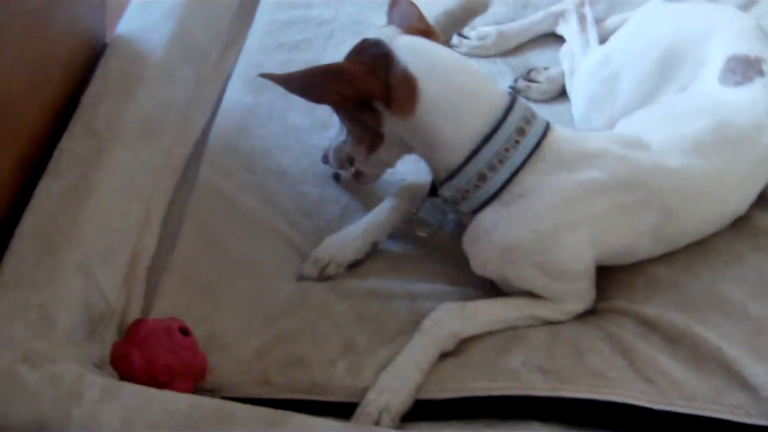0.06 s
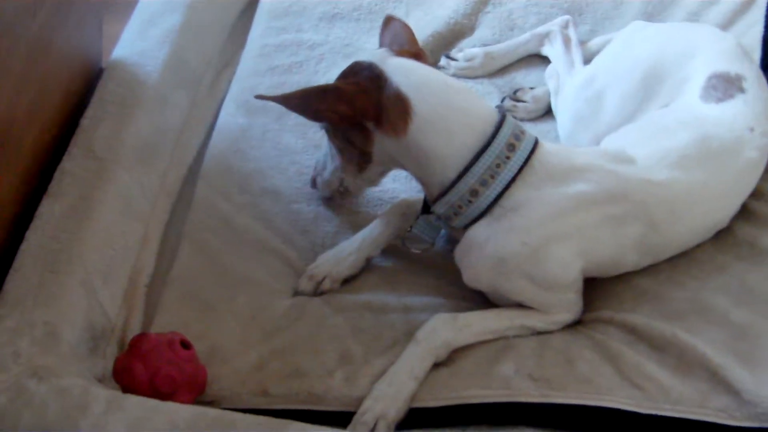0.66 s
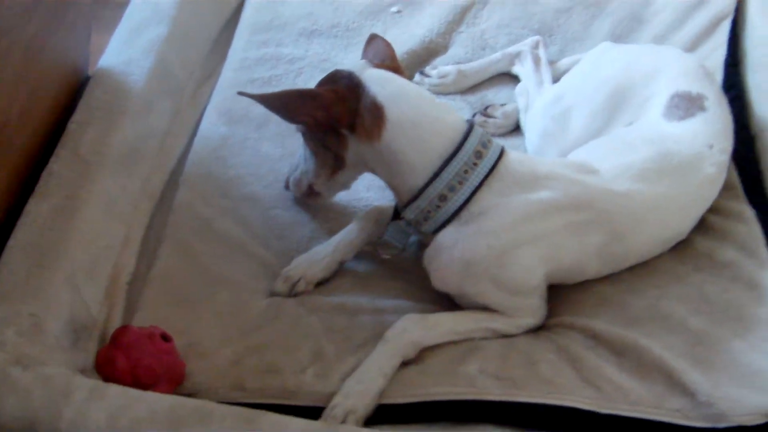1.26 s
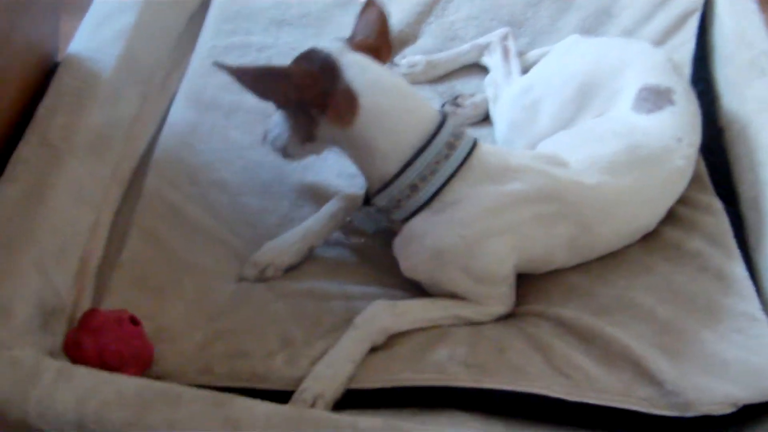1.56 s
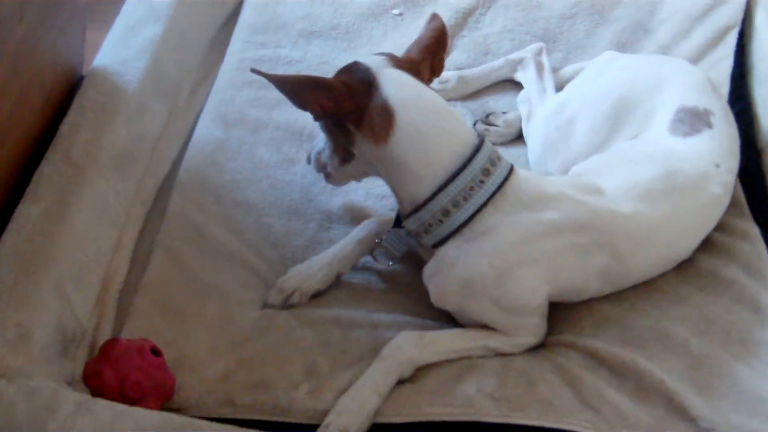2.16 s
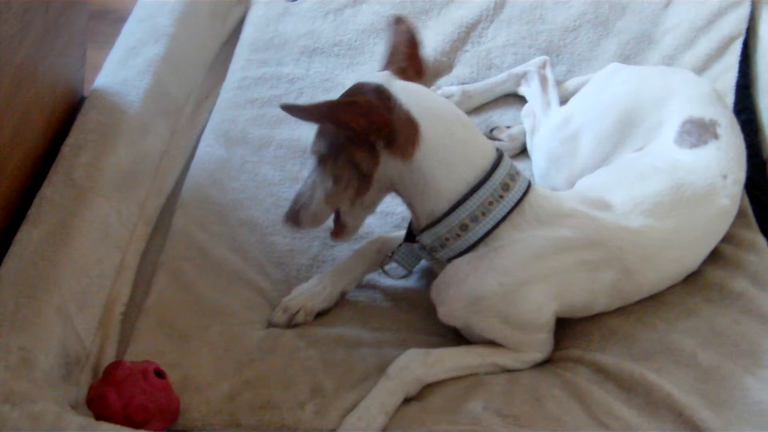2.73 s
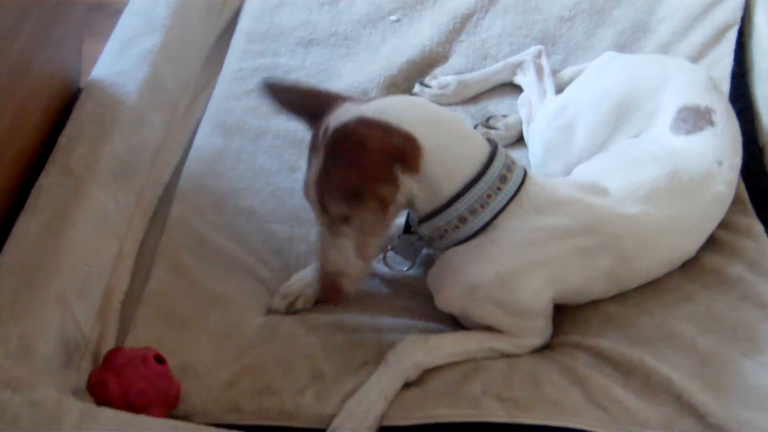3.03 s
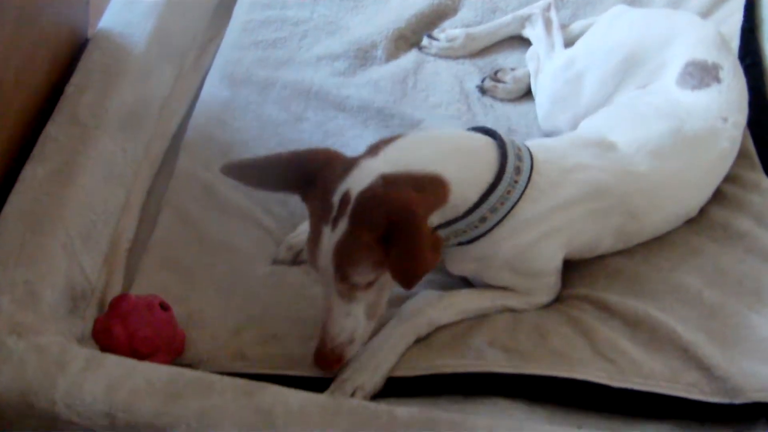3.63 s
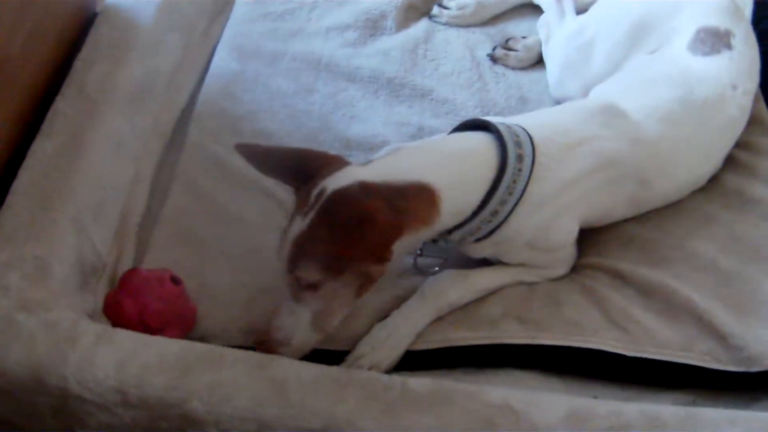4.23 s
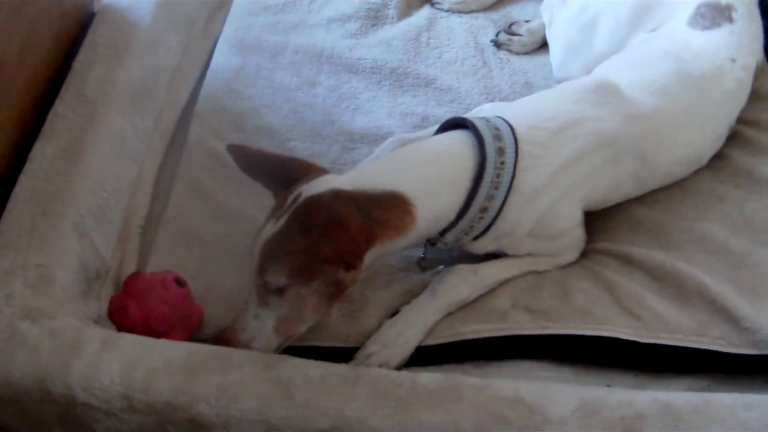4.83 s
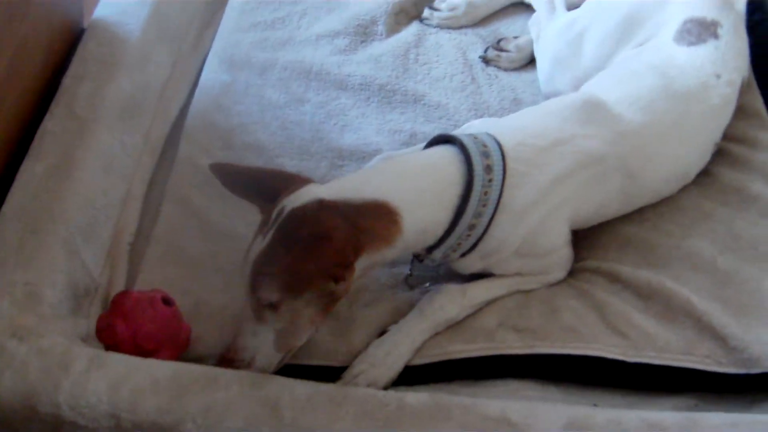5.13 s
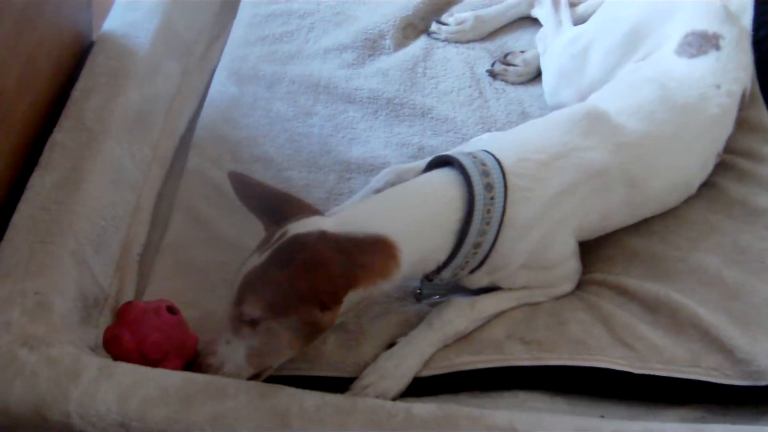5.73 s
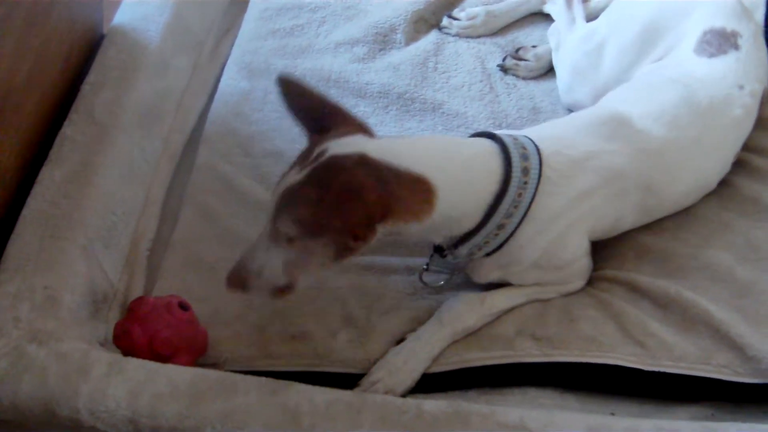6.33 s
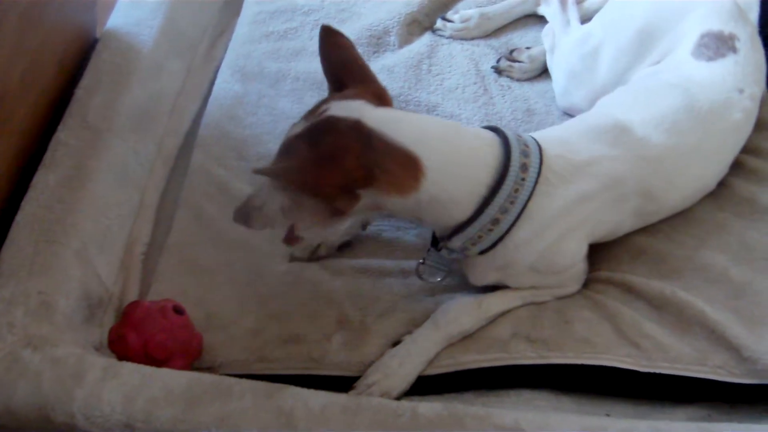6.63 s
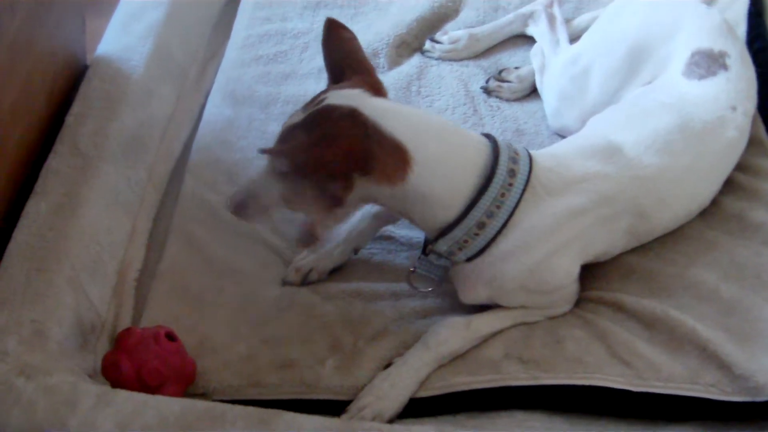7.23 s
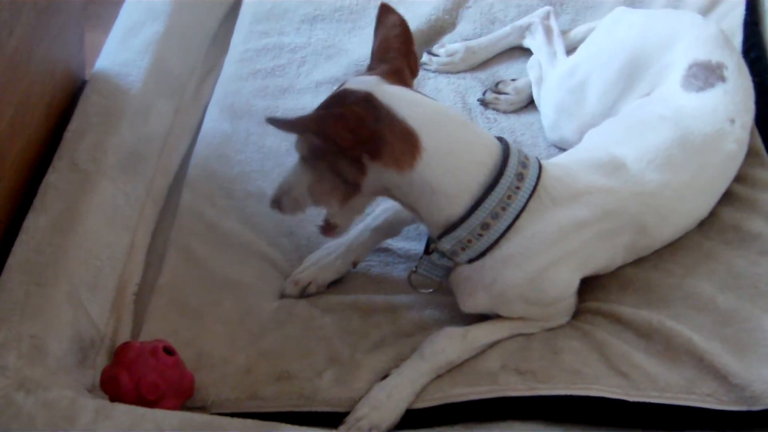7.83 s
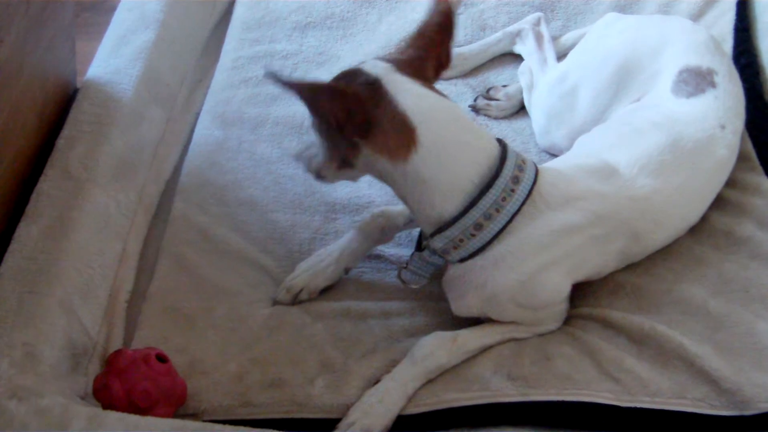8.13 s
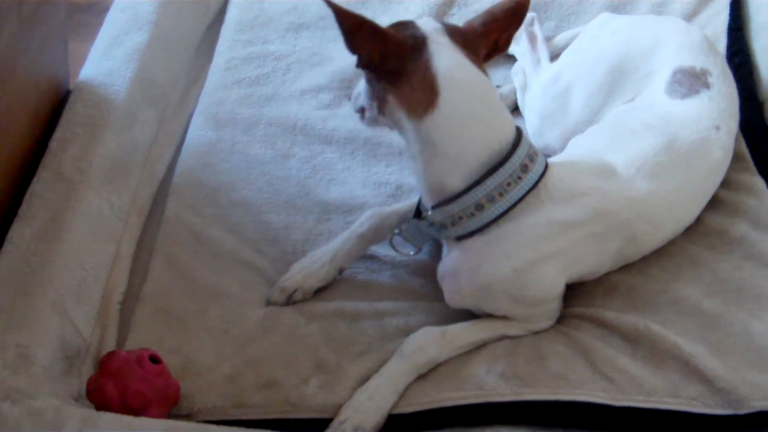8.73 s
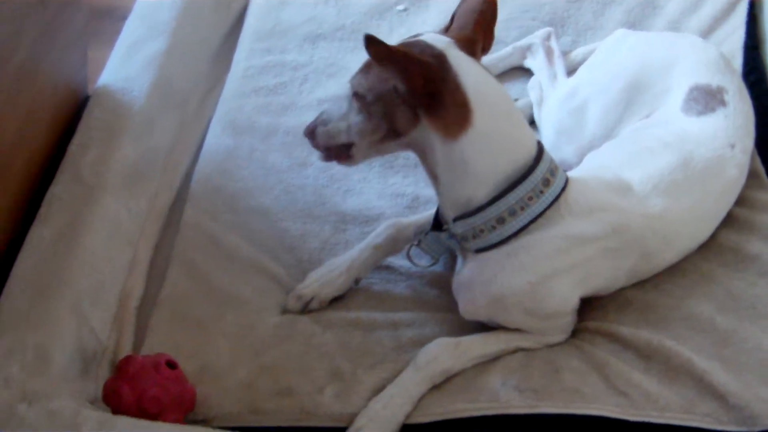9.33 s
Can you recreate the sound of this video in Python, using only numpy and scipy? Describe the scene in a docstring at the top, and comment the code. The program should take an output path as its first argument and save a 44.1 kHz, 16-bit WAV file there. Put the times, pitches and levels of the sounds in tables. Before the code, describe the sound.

A small dog crunches hard treats in a quiet room. A few crisp bites and a lip smack come first, then a second short bout. After a pause of several seconds with only faint hiss, it chews again in a longer, louder run of cracks, crumb crackle, tooth clicks and wet smacks. The sounds are small and centred, with a light room echo.

```python
"""A small dog crunches hard treats in three bouts, lying on its bed in a quiet, fairly live room.
Each bite is a cluster of tiny fractures that rings the treat, the teeth and the hollow of the mouth.
Crumbs crackle, teeth click, lips smack and the jaw thumps shut. Under the room's tail lie a steady
hiss, a faint low hum and the thin whine and buzz of a camera's electronics."""
import sys
import numpy as np
from scipy import signal
from scipy.fft import rfft, irfft
from scipy.io import wavfile

SR = 44100
rng = np.random.default_rng(int(sys.argv[2]) if len(sys.argv) > 2 else 0)


def wrap_up_sound(samples):
    """Save the sound to the file named by the first command line argument, as 16-bit audio."""
    columns = np.atleast_2d(samples).T
    # keep every value between -1 and 1, then stretch to whole-number steps
    tamed = np.clip(columns, -1, 1)
    steps = np.round(tamed * 32767).astype(np.int16)
    wavfile.write(sys.argv[1], SR, steps)


N = 422037
TIME = np.arange(N) / SR
BIN_HZ = np.arange(N // 2 + 1) * SR / N
HIT_TIME = np.arange(4096) / SR   # time axis of one short hit

# The jaw closes and breaks a treat. Each row: start in seconds, snap, splinter and mouth levels in dB,
# mouth resonance in Hz, thud level in dB, fracture time in seconds.
CHOMP_HITS = [(0.1104, -44, -47, -44, 1540, -51, 0.0024), (0.191, -43, -53, -44.5, 1510, -43.5, 0.00047),
              (0.5144, -50, -65, -54.5, 1510, -57.5, 0.00073), (1.9225, -36.5, -37, -37, 650, -44, 0.00053),
              (2.242, -41, -49, -46.5, 575, -48, 0.0013), (2.2781, -38.5, -48.5, -63, 585, -49.5, 0.00105),
              (6.8146, -35, -37, -28, 1447, -38, 0.00048), (7.1684, -38.5, -39.5, -37, 1460, -45, .0012),
              (7.422, -40, -44.5, -35.5, 1634, -48.5, 0.00048)]
# Small pieces chip off around the chomps. Each row: start in seconds, snap level in dB.
CHIP_HITS = [(0.3673, -46.5), (1.858, -57.5), (1.9545, -50), (2.657, -54), (6.868, -44), (6.9057, -42),
             (6.924, -43.5), (7.08, -49.5), (7.0995, -46), (7.117, -43.5), (7.126, -48), (7.2066, -42.5),
             (7.397, -42), (7.4486, -41), (7.717, -50), (7.747, -45.5)]
# Treat and teeth ringing in the snap. Each row: pitch in Hz, bandwidth in Hz, relative level in dB.
SNAP_RESONANCES = [(1880, 350, 8), (2557, 173, 7.5), (3130, 490, 3)]
# The ping of the teeth. Each row: pitch in Hz, bandwidth in Hz, relative level in dB.
TOOTH_RESONANCES = [(1880, 490, 7), (3650, 470, 6.5), (4570, 820, 4), (6430, 700, 6)]


def bite(snap_db, splinter_db, mouth_db, mouth_hz, thud_db, fracture_s,
         splinter_hz=5270, splinter_s=0.00054, mouth_q=6.2, spread_semitones=0.83):
    """The treat snaps and splinters, the mouth rings, the skull thuds and a few crumbs give way."""
    # The bright ring of the crust. Each row: pitch in Hz, bandwidth in Hz, relative level in dB.
    crust_resonances = [(3500, 2200, 3.5), (4550, 1800, 5), (6290, 1440, -1), (8640, 1130, -1.5),
                        (10800, 6900, -9.5)]
    # pieces differ in size, and so in pitch
    detune = 2 ** (spread_semitones * rng.standard_normal() / 12)
    piece_resonances = [(hz * detune, width, db) for hz, width, db in SNAP_RESONANCES]
    crumbs = at_level(fractures(length_s=0.0047, per_s=200, spread_db=6), db=-13)
    crack = fractures(fracture_s, per_s=14000, spread_db=3.5)
    force = at_level(whiten(crack), 0) + crumbs
    # the crust goes on splintering a little longer than the snap
    crust_crack = fractures(fracture_s + splinter_s, per_s=30000, spread_db=2)
    crust_force = at_level(whiten(crust_crack, order=90), 0) + crumbs
    snap = band(ring(force, piece_resonances), 1370, 6000)
    splinters = band(ring(crust_force, crust_resonances), splinter_hz / 1.57, splinter_hz * 2.16)
    mouth = band(resonate(force, mouth_hz, mouth_hz / mouth_q), mouth_hz / 1.17, mouth_hz * 2)
    thud = band(force, 494, 1235)
    return (at_level(snap, snap_db) + at_level(splinters, splinter_db)
            + at_level(mouth, mouth_db) + at_level(thud, thud_db))


def fractures(length_s, per_s, spread_db):
    """A running crack: uneven little breaks that swell at once and dwindle."""
    count = len(HIT_TIME)
    breaks = rng.random(count) < per_s / SR
    sizes = uneven_gains(count, spread_db) * rng.choice([-1, 1], count)
    age = HIT_TIME / length_s
    return breaks * sizes * np.sqrt(age) * np.exp(-age) + 1e-18


def chomp(shape):
    """A full bite, with the soft thump of the closing jaw."""
    return bite(*shape) + pop(db=-59, hz=248, cycles=0.44)


def chip(start_s, snap_db, shut_db=1.5, open_db=-5, reopen_s=0.21):
    """A small, quick bite; the mouth rings most while the jaw is still shut from the last chomp."""
    chomp_s, _, _, _, chomp_hz, _, _ = np.transpose(CHOMP_HITS)
    since_chomp_s = start_s - chomp_s[chomp_s < start_s].max(initial=0)
    mouth_db = snap_db + np.interp(since_chomp_s, [0, reopen_s], [shut_db, open_db])
    nearest = np.argmin(np.abs(chomp_s - start_s))
    mouth_hz = chomp_hz[nearest] * 2 ** (-1 / 12)   # a semitone under the nearest chomp
    return bite(snap_db, splinter_db=snap_db - 11, mouth_db=mouth_db, mouth_hz=mouth_hz,
                thud_db=snap_db - 10, fracture_s=0.00086)


def tooth_clicks():
    """Teeth graze each other and ping."""
    # Tooth meets tooth. Each row: start in seconds, level in dB.
    contacts = [(0.378, -52), (6.386, -52.5), (6.655, -41), (7.061, -53.5), (7.1, -62), (7.375, -54),
                (7.403, -51), (7.865, -54)]
    clicks = []
    for start_s, db in contacts:
        graze = whiten(fractures(length_s=0.00097, per_s=22000, spread_db=-0.5))
        ping = band(ring(graze, TOOTH_RESONANCES), 1500, 7500)
        clicks.append((start_s, at_level(ping, db)))
    return placed(clicks)


def grit(level_db=-57, per_s=220, spread_s=0.015, follow=0.25):
    """Crumbs grind around each break, louder under a harder bite; each crumb ticks one resonance."""
    breaks = np.array([row[:2] for row in CHOMP_HITS + CHIP_HITS])
    hardest_db = breaks[:, 1].max()
    swells = [from_db(follow * (db - hardest_db)) / (1 + ((TIME - s) / spread_s) ** 2)
              for s, db in breaks]
    resonances = TOOTH_RESONANCES + SNAP_RESONANCES
    crackle = 0
    for hz, width, _ in resonances:
        ticks = (rng.random(N) < per_s / len(resonances) / SR) * uneven_gains(N, spread_db=4)
        crackle += rms_one(resonate(ticks + 1e-18, hz, width))
    return from_db(level_db) * np.max(swells, axis=0) * rms_one(crackle)


def lip_smacks():
    """Lips and tongue pop, always ringing the same small wet cavity."""
    # The wet pops. Each row: start in seconds, level in dB.
    smacks = [(.4755, -45), (6.3945, -48), (6.4425, -51), (7.082, -49), (7.102, -47), (7.1205, -41),
              (7.127, -43), (8.81, -58)]
    return placed((s, pop(db, hz=2080, cycles=1.7)) for s, db in smacks)


def pop(db, hz, cycles):
    """A small cavity is set ringing softly: it peaks after the given cycles and dies away."""
    age = HIT_TIME * hz / cycles
    return at_level(np.sin(2 * np.pi * hz * HIT_TIME) * age * np.exp(-age), db)


def room(x, wall_echo_s=0.0097, wall_gain=0.5, early_db=-10, diffuse_s=0.11):
    """A near wall answers; separate reflections thicken into a diffuse tail that dies band by band."""
    # The room's decay. Each row: frequency in Hz, time to fall 60 dB in seconds.
    decay_times = [(200, 0.75), (700, 0.56), (1500, 0.83), (3000, 0.5), (6000, 0.54), (12000, 0.098)]
    t = np.arange(SR * 3 // 4) / SR
    density = np.clip((t / diffuse_s) ** 2, 0.02, 1)
    arrivals = rng.random((2, len(t))) < density
    echoes = arrivals * rng.choice([-1, 1], arrivals.shape) / np.sqrt(density)
    edges_hz = np.geomspace(100, 18000, num=12)
    tail = 0
    for k, (low, high) in enumerate(zip(edges_hz, edges_hz[1:])):
        t60 = at_hz(decay_times, np.sqrt(low * high))
        tail += band(echoes[k % 2], low, high) * from_db(-60 * t / t60)
    tail[t < wall_echo_s] *= from_db(early_db)   # the bed swallows most of the earliest sound
    tail /= np.sqrt(np.sum(tail ** 2))
    tail[int(wall_echo_s * SR)] += wall_gain
    return signal.fftconvolve(x, tail)[:N]


def electronics(whine_hz=7897, buzz_hz=15254, hum_hz=55):
    """A thin whine and a very high buzz pulse at the scan rate over a low hum; buzz and hum waver."""
    phase = 2 * np.pi * whine_hz * TIME
    whine = from_db(-75) * np.sin(phase)
    ticks = from_db(-76) * scan_pulses(decay_s=0.0016, lead_s=0) * np.cos(phase)
    pulses = scan_pulses(decay_s=0.0008, lead_s=0.005) + scan_pulses(decay_s=0.0001, lead_s=0.015)
    buzz = band(pulses * np.sin(2 * np.pi * buzz_hz * TIME), 10500, 18000)
    hum = rms_one(band(rng.standard_normal(N), hum_hz / 1.14, hum_hz * 1.097))
    buzz *= from_db(-63 + 0.6 * wavering(rate_hz=0.5))
    hum *= from_db(-77 + 0.5 * wavering(rate_hz=0.94))
    return np.sqrt(2) * (whine + ticks) + buzz + hum


def scan_pulses(decay_s, lead_s, scan_hz=60.06):
    """A dying pulse once in every scan of the electronics; rms 1."""
    return rms_one(np.exp(-((TIME + lead_s) % (1 / scan_hz)) / decay_s))


def hiss(level_db=-57, side_db=-14):
    """A smooth noise floor, nearly the same left and right."""
    # The colour of the hiss in the centre. Each row: frequency in Hz, relative level in dB.
    mid_colour = [(25, -3.5), (52, -20), (90, -7), (200, -5), (500, -2.5), (1200, 0), (2200, -2),
                  (3500, -4.5), (5500, -9), (7500, -11), (9000, -12.5), (11000, -16.5), (15000, -17.5)]
    # The colour of its stereo spread. Each row: frequency in Hz, relative level in dB.
    side_colour = [(24, -55), (40, -18.5), (1270, -1.5), (3820, -1.5), (7220, -2.5), (7970, -21),
                   (8580, -3.5), (12100, -5.5), (13000, -16), (14000, -36)]
    mid = shaped_noise(from_db(at_hz(mid_colour, BIN_HZ)))
    side = shaped_noise(from_db(at_hz(side_colour, BIN_HZ)))
    return from_db(level_db) * (mid + from_db(side_db) * side * [[1], [-1]])


def shaped_noise(gains):
    """Noise with one gain for each frequency bin; rms 1."""
    return rms_one(irfft(rfft(rng.standard_normal(N)) * gains, N))


def wavering(rate_hz):
    """A slow, smooth random drift; rms 1."""
    return shaped_noise((BIN_HZ > 0) * np.exp(-(BIN_HZ / rate_hz) ** 2))


def uneven_gains(count, spread_db):
    """Random gains around 1, with the extremes held in."""
    return from_db(spread_db * np.clip(rng.standard_normal(count), -2, 2))


def whiten(x, order=220):
    """Flatten a burst's chance colour at minimum phase, so that only the resonances colour it."""
    spectrum = rfft(x)
    cepstrum = irfft(np.log(np.abs(spectrum) + 1e-12))[:order]
    cepstrum[1:] *= 2
    return irfft(spectrum / np.exp(rfft(cepstrum, len(x))))


def ring(x, resonances):
    """Parallel resonances of alternating sign; level and bandwidth set each one's share of energy."""
    return sum((-1) ** k * from_db(db) * np.sqrt(width) * rms_one(resonate(x, hz, width))
               for k, (hz, width, db) in enumerate(resonances))


def resonate(x, hz, width_hz):
    """Two-pole resonance with gain 1 at its peak."""
    radius = np.exp(-np.pi * width_hz / SR)
    feedforward = np.array([1, 0, -1]) * (1 - radius ** 2) / 2
    feedback = [1, -2 * radius * np.cos(2 * np.pi * hz / SR), radius ** 2]
    return signal.lfilter(feedforward, feedback, x)


def band(x, low_hz, high_hz):
    """Band-pass with 12 dB per octave skirts."""
    return signal.sosfilt(signal.butter(2, [low_hz, high_hz], "band", fs=SR, output="sos"), x)


def at_hz(points, hz):
    """Read a table on a log-frequency axis."""
    known_hz, values = np.transpose(points)
    return np.interp(np.log(np.maximum(hz, 1)), np.log(known_hz), values)


def at_level(x, db):
    """Give a short sound the energy of 8 ms at this level."""
    return from_db(db) * x * np.sqrt(0.008 * SR / (np.sum(x ** 2) + 1e-20))


def from_db(db):
    """Decibels to gain."""
    return 10 ** (np.asarray(db) / 20)


def rms_one(x):
    """Scale to rms 1."""
    return x / np.sqrt(np.mean(x ** 2) + 1e-20)


def placed(events):
    """Lay (start in seconds, sound) pairs on the timeline."""
    track = np.zeros(N + SR)
    for start_s, sound in events:
        start = int(start_s * SR)
        track[start:start + len(sound)] += sound
    return track[:N]


def scene(width_db=-27, smack_send_db=-10):
    """The dog dead centre in a narrow image of its room, over the steady background."""
    # The muzzle turns, feeding the room more or less. Each row: time in seconds, reverb send in dB.
    facing = [(.15, -4), (.5, -1.5), (2.2, -3.5), (6.6, -5.5), (7.8, -5.5)]
    chomps = placed((s, chomp(shape)) for s, *shape in CHOMP_HITS)
    chips = placed((s, chip(s, db)) for s, db in CHIP_HITS)
    chewing = chomps + chips + tooth_clicks() + grit()
    smacks = lip_smacks()
    send_gain = from_db(np.interp(TIME, *np.transpose(facing)))
    send = send_gain * (chewing + from_db(smack_send_db) * smacks)
    reverb = room(send) + from_db(width_db) * room(send) * [[1], [-1]]
    return chewing + smacks + reverb + electronics() + hiss()


def record(dry, cutoff_hz=15310):
    """A steep low-pass shaves off the very top."""
    return signal.sosfilt(signal.ellip(14, 0.2, 80, cutoff_hz, fs=SR, output="sos"), dry)


dry = scene()
out = record(dry)
wrap_up_sound(out)
```